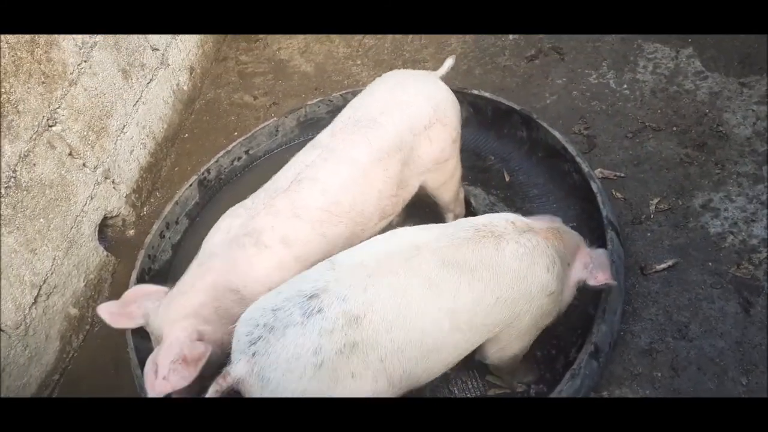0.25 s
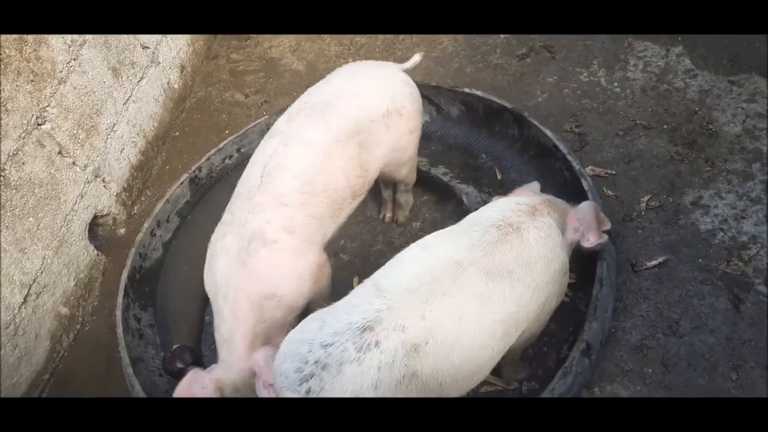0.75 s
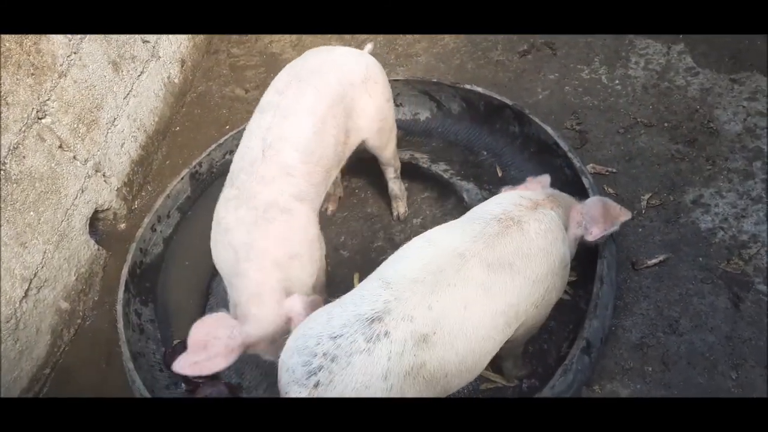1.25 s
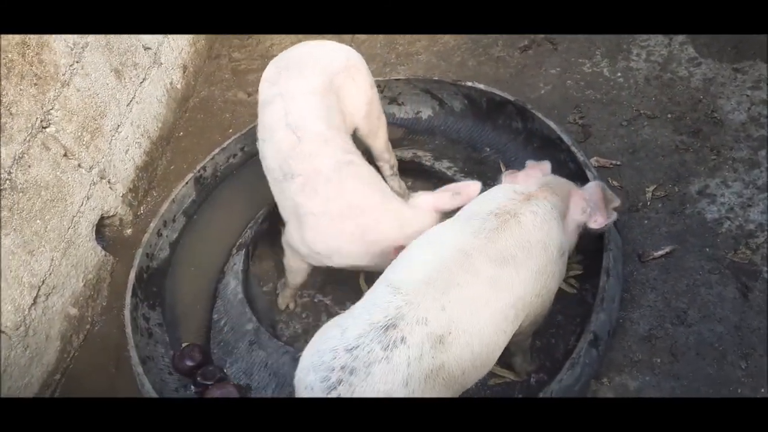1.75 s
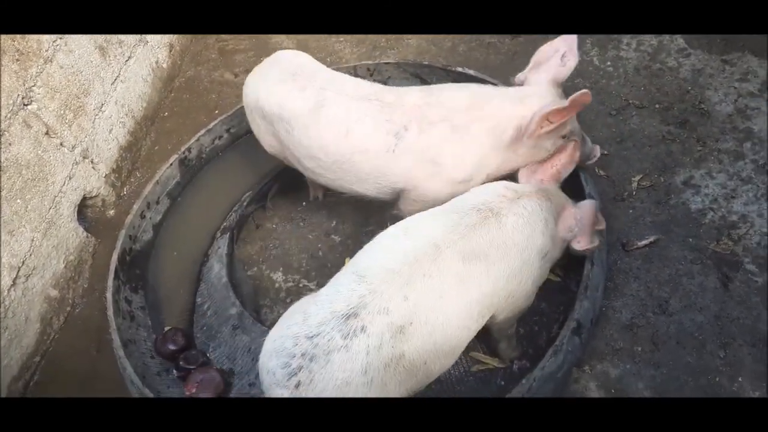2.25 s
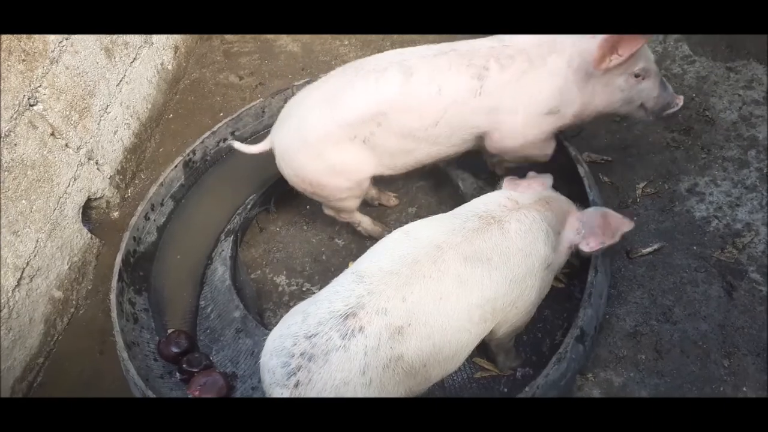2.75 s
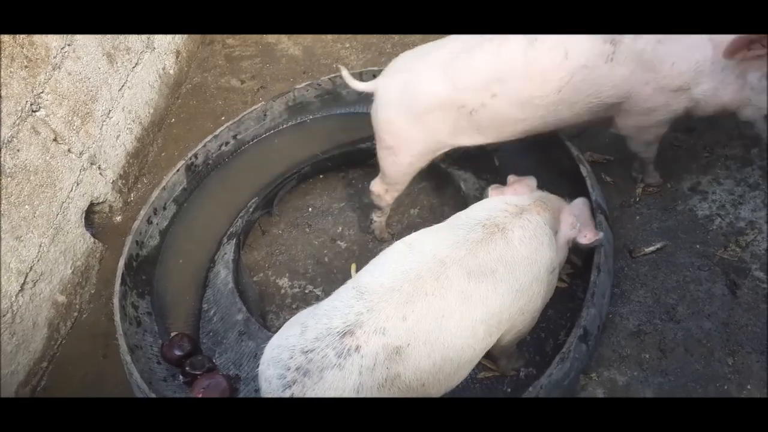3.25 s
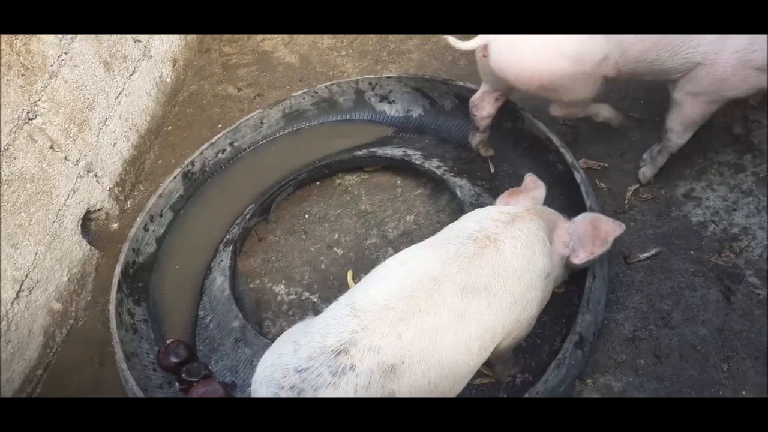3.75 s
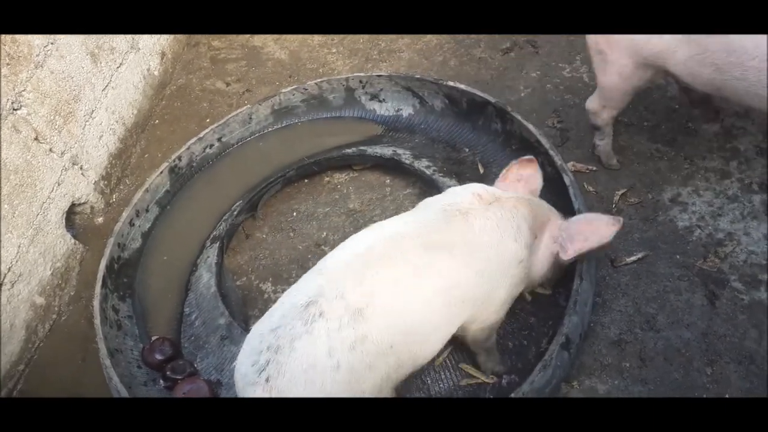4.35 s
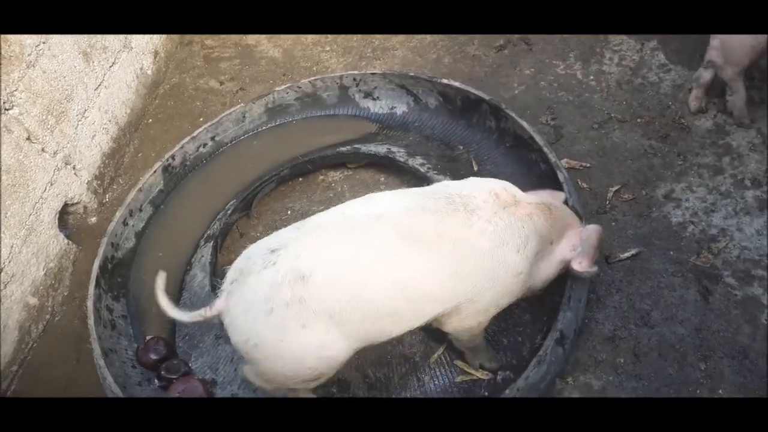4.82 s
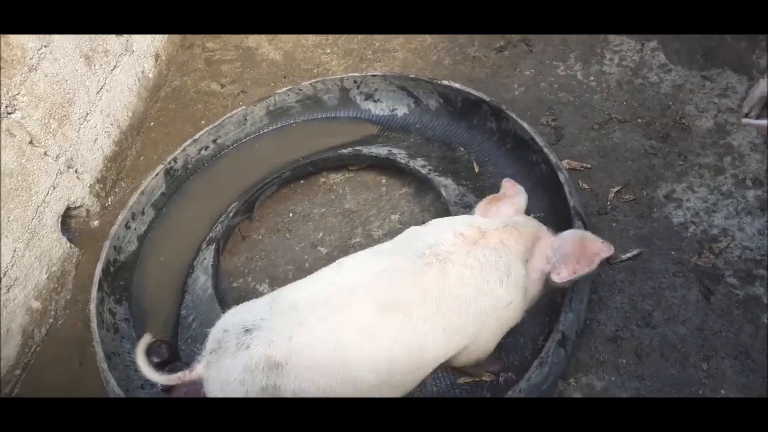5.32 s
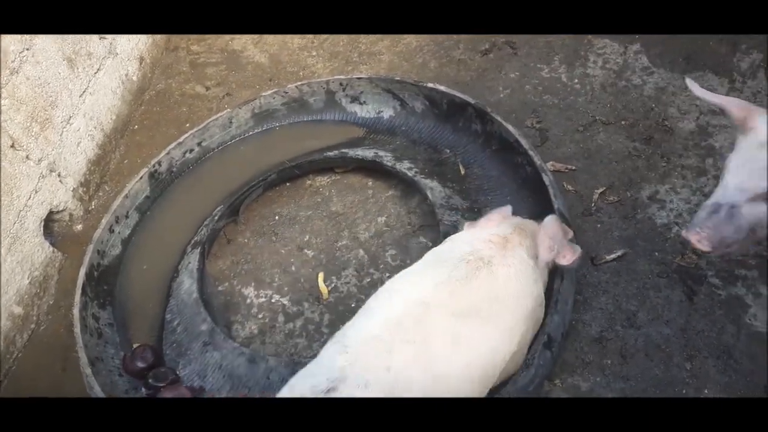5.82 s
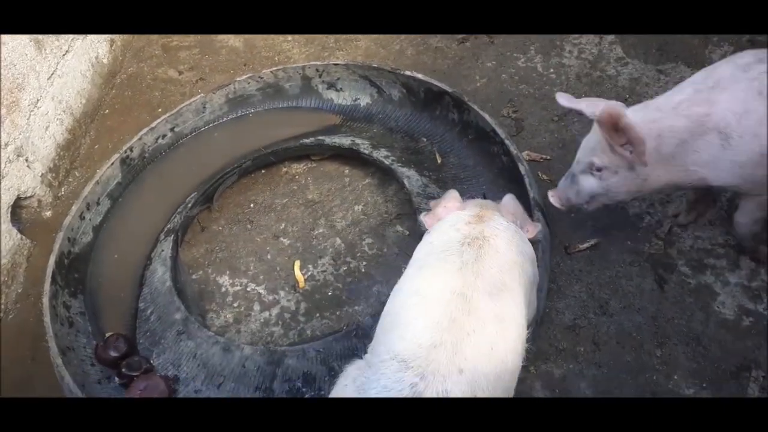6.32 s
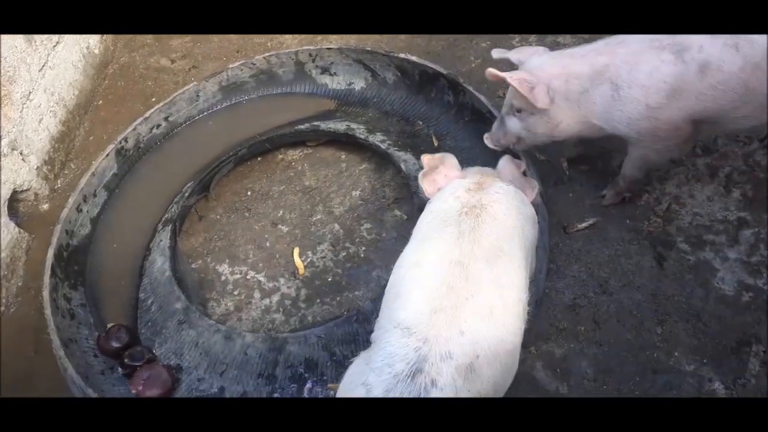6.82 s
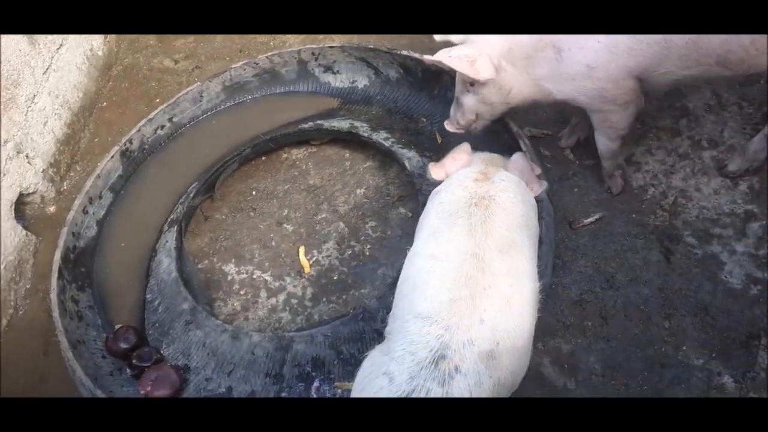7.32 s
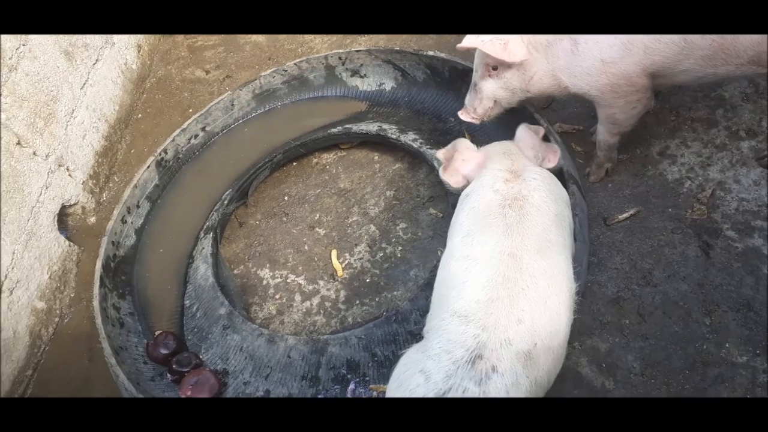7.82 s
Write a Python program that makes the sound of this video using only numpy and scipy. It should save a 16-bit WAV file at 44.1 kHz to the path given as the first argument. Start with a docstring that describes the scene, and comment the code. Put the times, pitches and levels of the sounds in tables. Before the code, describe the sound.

Two young pigs feed from a halved rubber tyre in a small concrete sty, heard close in stereo, slightly to the right. For the first two seconds there are soft wet smacks, chewing, tiny dry clicks and a few light knocks. At about 2.5 seconds a hoof stamps hard on the wet rim, the loudest sound, a sharp slap with a brief hollow boom. From 3 to 5.5 seconds hooves and snouts knock irregularly on the rubber while slop churns, with small splashes around 4.3, a low thud at 4.6 and a strong knock at 4.8. Between 5.7 and 6.7 seconds the pigs snuffle and smack busily among lighter knocks, and a faint, thin high hiss comes up and stays. The last second or so is quieter, with soft chewing and a throaty snuffle near 7.7 seconds.

```python
"""Two young pigs at a tyre trough

A stereo pair in a small concrete sty, the pigs a little to the right, feeding from a halved tyre.
They smack and chew, hooves and snouts knock the rubber, and one stamps hard as it climbs out.
Snouts churn the slop; the close walls boom briefly, and a thin high hiss comes up toward the end."""
import sys
import numpy as np
from scipy import signal
from scipy.fft import rfft, irfft, next_fast_len
from scipy.io import wavfile
from scipy.ndimage import uniform_filter1d, map_coordinates

SR = 44100
rng = np.random.default_rng(int(sys.argv[2]) if len(sys.argv) > 2 else 0)


def dump(signal):
    """Clip the signal to [-1, 1] and save it as 16-bit WAV at the path in sys.argv[1]."""
    limited = np.clip(np.atleast_2d(signal).T, -1, 1)
    pcm = np.round(limited * 32767).astype(np.int16)
    wavfile.write(sys.argv[1], SR, pcm)


N = 356063

# Spectra of chewing, wet slaps and struck rubber. Each row: frequency in Hz, level in dB.
CHEW_SPECTRUM = [(600, -27), (1000, -2.5), (1600, 2.5), (2300, -4), (3300, -6), (5000, -8.5), (9000, -48.5)]
WET_SPECTRUM = [(200, -44), (700, 18), (1500, 5), (2600, -16), (4500, 4.5), (8000, 0), (15000, -10)]
RUBBER_SPECTRUM = [(30, -45), (70, -27), (150, -8), (220, 2.5), (330, 4.5), (550, 0), (850, 1.5),
                   (1300, -7), (3000, -22), (9000, -64)]
# How alike the sty sounds at the two microphones. Each row: frequency in Hz, likeness from 0 to 1.
COHERENCE = [(100, 0.82), (300, 0.96), (700, 0.93), (2000, 0.19), (4500, 0.068), (12000, 0.033)]


def amp(db):
    return 10 ** (np.asarray(db) / 20)


def unit(x):
    return x / np.sqrt(np.mean(x ** 2) + 1e-20)


def crest(x):
    """Scale a burst so that its loudest 4 ms have rms 1."""
    return x / np.sqrt(uniform_filter1d(x * x, size=176).max() + 1e-20)


def fade(t, t60):
    """Exponential decay, 60 dB down after t60."""
    return np.exp(-np.log(1000) * t / max(t60, 1e-3))


def rise(t, seconds):
    return 1 - np.exp(-t / seconds)


def along(points, hz):
    """Read (Hz, value) points on a log axis."""
    freqs, values = np.transpose(points)
    return np.interp(np.log(hz + 1), np.log(freqs + 1), values)


def wobble(rate, n):
    """A smooth random curve of n samples, rate knots a second."""
    return map_coordinates(rng.standard_normal(int(n * rate / SR) + 4), [np.arange(n) * rate / SR])


def filtered(x, response):
    """x through a complex frequency response."""
    n = x.shape[-1]
    padded = next_fast_len(n + 4096)
    return irfft(rfft(x, padded) * response(np.fft.rfftfreq(padded, 1 / SR)), padded)[..., :n]


def coloured(x, spectrum):
    """x shaped by a spectrum, at rms 1."""
    return unit(filtered(x, lambda hz: amp(along(spectrum, hz))))


def cavity(x, hz, q):
    """x through one resonance, at rms 1."""
    return unit(filtered(x, lambda f: 1j * f * hz / q / (hz ** 2 - f * f + 1j * f * hz / q)))


def crackle(n, spread_db):
    """Noise broken into millisecond grains of uneven size."""
    return rng.standard_normal(n) * amp(spread_db * np.clip(wobble(900, n), -2, 2))


def add(track, start, sound):
    """Mix a sound into the track at start seconds."""
    part = track[:, max(round(start * SR), 0):][:, :sound.shape[-1]]
    part += sound[..., :part.shape[1]]


def at_mics(x, start=0):
    """The left microphone is shaded; the pig near the middle is heard first,
    then feeding further right reaches that microphone later."""
    # Each row: time in seconds, delay at the left microphone in seconds.
    left_delay = [(0, .00005), (1.7, .00005), (2.1, .00043), (8.07, .00043)]
    n = np.arange(len(x))
    lag = np.round(SR * np.interp(start + n / SR, *np.transpose(left_delay))).astype(int)
    return np.array([amp(-1.3) * x[np.maximum(n - lag, 0)], x])


def in_sty(x, start, wet_db):
    """Direct sound plus the answer of the close walls, different for every spot."""
    # Each row: frequency in Hz, reverberation time in seconds.
    wall_t60 = [(100, 1), (400, 0.24), (1000, 0.16), (2500, 0.15), (8000, 0.12), (16000, 0.15)]
    hz, t, noise = signal.stft(rng.standard_normal((3, SR // 2)), SR, nperseg=256)
    alike = along(COHERENCE, hz)[:, None]
    pair = np.sqrt(alike) * noise[0] + np.sqrt(1 - alike) * noise[1:]
    decay = np.exp(-np.log(1000) * t / along(wall_t60, hz)[:, None])
    tail = signal.istft(pair * decay, SR, nperseg=256)[1]
    tail *= 1 - np.exp(-(np.arange(tail.shape[1]) / SR / 0.0013) ** 2)
    out = amp(wet_db) * signal.fftconvolve(x[None], tail / np.linalg.norm(tail[0]), axes=1)
    out[:, :len(x)] += at_mics(x, start)
    return out


def diffuse(spectrum, grain_db, lump_db, lump_rate, from_trough=True):
    """A stereo bed of rms 1 made of grains that come in lumps."""
    shared = crackle(N, grain_db)
    shared = at_mics(shared) if from_trough else np.array([shared, shared])
    own = np.array([crackle(N, grain_db), crackle(N, grain_db)])
    pair = filtered(shared, lambda hz: np.sqrt(along(COHERENCE, hz)))
    pair += filtered(own, lambda hz: np.sqrt(1 - along(COHERENCE, hz)))
    return coloured(pair * amp(lump_db * wobble(lump_rate, N)), spectrum)


def knocks():
    """Hooves and snouts strike the tyre: a damped note of rubber, a dull rattle, a thud, a wet crack."""
    # Each row: start in seconds, level in dB, pitch in Hz, relative rattle in dB.
    blows = [(.583, -41, 486, -3.5), (.593, -42.5, 264, -3.5), (.703, -35, 490, -8), (.708, -48, 215, -3),
             (1.806, -37, 753, -5), (1.932, -36, 884, -6), (2.008, -39, 297, -5.5), (2.479, -19, 335, -31),
             (2.839, -40, 245, -1.5), (3, -37.5, 193, -2.5), (3.244, -29, 770, -5.5),
             (3.257, -33, 219, -6.5), (3.3581, -26.5, 800, 1.5), (3.363, -24, 314, -3.5),
             (3.48, -37.5, 201, 0), (3.751, -32.5, 342, -11), (3.83, -40, 336, -3.5), (4.079, -46, 298, -2),
             (4.191, -37, 470, -20), (4.251, -37.5, 202, -2), (4.257, -28, 333, -5.5),
             (4.298, -37.5, 317, 1), (4.4344, -27.5, 370, -8.5), (4.542, -33.5, 490, -17),
             (4.639, -35, 208, -24), (4.8075, -17, 787, -13), (5.053, -29, 765, -10.5),
             (5.098, -31, 356, -7), (5.269, -29.5, 480, -10), (5.333, -33, 364, -6.5),
             (5.698, -40, 358, 4.5), (5.738, -36, 610, 0.5), (5.772, -33, 387, -6.5), (6.072, -47, 420, 5),
             (6.211, -37, 342, -24), (6.263, -34.5, 360, -5.5), (6.341, -35, 350, -2.5),
             (6.505, -47, 295, 4), (6.613, -32.5, 357, -15)]
    out, t = np.zeros((2, N)), np.arange(SR // 2) / SR
    ring_cycles, contact_s = 17, 0.0014
    give = 1 - np.exp(-(t / contact_s) ** 2)
    for start, db, hz, rattle_db in blows:
        t60 = ring_cycles / hz * 2 ** (-(db + 30) / 29)  # harder blows press and damp the rubber sooner
        thud_db = -19.5 - 6 * np.log2(hz / 347)  # low blows shake the tyre wall most
        crack_db = -45 + 0.099 * db - db  # the wet film's slap grows only a little with force
        noise = rng.standard_normal((2, len(t)))
        note = crest(np.sin(2 * np.pi * hz * t) * fade(t, t60) * rise(t, 0.0012))
        rattle = crest(coloured(noise[0], RUBBER_SPECTRUM) * fade(t, 0.051) * give)
        thud = crest(np.sin(2 * np.pi * 112 * t) * fade(t, 0.14) * rise(t, 0.014))
        crack = crest(coloured(noise[1], WET_SPECTRUM) * fade(t, 0.042))
        blow = note + amp(rattle_db + 5) * rattle + amp(thud_db) * thud + amp(crack_db) * crack
        add(out, start, amp(db - 5) * in_sty(blow + amp(-23) * hollow(t), start, wet_db=-8.5))
    return out


def stamp():
    """A hoof slaps the wet rim: a sharp crack, a short bright ring and a long shudder."""
    # Each row: start in seconds, level in dB.
    hoof_falls = [(2.4703, -12.5)]
    # Each row: frequency in Hz, level in dB, time to fall 60 dB in seconds.
    rim_modes = [(684, 4.5, 0.019), (1450, 3, 0.018), (1660, 3.5, 0.022), (2114, 0, 0.025),
                 (2550, -31, 0.033)]
    out, t = np.zeros((2, N)), np.arange(SR // 2) / SR
    for start, db in hoof_falls:
        ring = sum(amp(level) * fade(t, t60) * np.sin(2 * np.pi * hz * t) for hz, level, t60 in rim_modes)
        crack = coloured(rng.standard_normal(len(t)), WET_SPECTRUM) * fade(t, 0.0055)
        shudder = coloured(rng.standard_normal(len(t)), RUBBER_SPECTRUM) * fade(t, 0.56)
        slap = amp(-7) * ring + amp(-34) * crack + amp(-17) * shudder + amp(-13.5) * hollow(t)
        add(out, start, amp(db) * in_sty(slap, start, wet_db=-9))
    return out


def hollow(t):
    """After a blow the low modes of trough and sty build up and die, wavering as neighbours beat."""
    # Each row: frequency in Hz, level in dB, time to fall 60 dB in seconds.
    low_modes = [(214, -8, .4), (265, -8, .3), (338, 0, .38), (430, -9, .28), (470, -5, .35), (501, 1, .42),
                 (632, -7, .32), (708, -10, .28), (850, -11, .26)]
    boom = np.zeros(len(t))
    for hz, db, t60 in low_modes:
        envelope = amp(db + 2.5 * wobble(30, len(t))) * fade(t, t60)
        phase = 2 * np.pi * (hz * t + rng.random()) + 0.9 * wobble(40, len(t))
        boom += envelope * np.sin(phase)
    return boom * rise(t, 0.03)


def bumps():
    """A body's weight sets the tyre wall booming; the note swells and dies."""
    # Each row: start in seconds, level in dB, pitch in Hz, swell and 60 dB decay in seconds.
    shoves = [(1.997, -36.5, 125, 0.01, 0.12), (2.345, -41, 115, .012, 0.13), (2.488, -19, 119.2, .05, 0.4),
              (2.69, -38, 112.4, 0.018, 0.49), (4.64, -21, 110.5, 0.033, 0.18),
              (7.181, -38, 83, 0.011, 0.064)]
    out, t = np.zeros((2, N)), np.arange(SR) / SR
    for start, db, hz, swell, t60 in shoves:
        phase = 2 * np.pi * hz * t + 0.13 * wobble(20, len(t))
        add(out, start, amp(db) * at_mics(np.sin(phase) * fade(t, t60) * rise(t, swell), start))
    return out


def smacks():
    """Wet films peel, then tear in tiny pops that ring mouth and lips and throw a fine spray."""
    # Each row: time in seconds, level in dB, mouth and lip pitch in Hz, brightness in dB, decay in seconds.
    tears = [(.048, -45.5, 1680, 6000, -1.5, .04), (0.131, -40.5, 2180, 2700, -2.5, 0.025),
             (0.302, -39.5, 1720, 3400, -1.5, 0.028), (0.404, -46, 2300, 2970, 1, 0.083),
             (0.445, -45, 1740, 2490, -5, 0.04), (0.583, -48.5, 1290, 4300, -0.5, 0.079),
             (0.7006, -47.5, 2280, 2720, 1.5, 0.054), (1.119, -49, 1400, 2370, -4.5, .06),
             (1.424, -44.5, 1520, 2240, -13, 0.098), (1.4974, -49, 1550, 4660, 0.5, .054),
             (1.85, -48, 1280, 5900, -8, .057), (1.888, -44.5, 1960, 3230, -4, .041),
             (1.987, -47.5, 1280, 8540, -8.5, 0.053), (2.468, -19, 1620, 2300, -7, 0.024),
             (2.688, -46, 1420, 7660, -6, 0.046), (2.799, -45, 1490, 2620, -8.5, 0.026),
             (3.152, -35.5, 1700, 3700, -4, 0.02), (3.408, -41.5, 1350, 2740, -3, 0.099),
             (3.873, -41.5, 1510, 2380, -8, 0.05), (3.902, -49, 1520, 5400, -3.5, 0.038),
             (4.251, -40, 1280, 2680, -6, .06), (4.2843, -35, 1720, 3220, -2.5, 0.043),
             (4.389, -36, 1940, 3020, -10, 0.028), (4.476, -41.5, 1450, 4800, -11, 0.026),
             (5.012, -45, 1960, 2800, -2.5, 0.071), (5.1906, -42.5, 1920, 4170, -8, 0.048),
             (5.361, -45.5, 1960, 2730, -2.5, 0.23), (5.465, -51, 1780, 5460, 6.5, 0.016),
             (5.5298, -42, 1810, 5350, -11.5, 0.047), (5.698, -37.5, 1450, 2770, -6.5, 0.03),
             (5.841, -41.5, 2260, 3470, -1.5, .038), (5.977, -41.5, 1700, 2720, -4.5, 0.29),
             (6.0377, -39, 1690, 5100, -1.5, 0.1), (6.1215, -41, 2440, 3040, -0.5, 0.064),
             (6.333, -38, 1900, 2680, -7, 0.15), (6.3988, -36.5, 2430, 3500, -0.5, 0.085),
             (6.6614, -38.5, 2390, 2520, -4, 0.044)]
    peel_s = 0.007
    out, t = np.zeros((2, N)), np.arange(SR // 4) / SR - peel_s
    for start, db, mouth_hz, lip_hz, bright_db, t60 in tears:
        shape = np.where(t < 0, amp(-12) * np.exp(-np.abs(t) / 0.005), fade(np.abs(t), t60))
        pops = crackle(len(t), spread_db=4) * amp(2 * wobble(200, len(t))) * shape
        mouth = cavity(cavity(pops, mouth_hz, q=3.5), mouth_hz, q=1.45)
        mouth = crest(mouth + amp(-6) * coloured(pops, WET_SPECTRUM))
        lips = crest(cavity(cavity(pops, lip_hz, q=4.1), lip_hz, q=0.26))
        mouth_share = np.sqrt(np.clip(1 - amp(bright_db) ** 2, 0.15, 1))  # the cavities share the energy
        spray_db = -6.5 + 1.27 * bright_db  # brighter smacks throw more spray
        smack = mouth_share * mouth + amp(bright_db) * lips + amp(spray_db) * spray(shape)
        add(out, start - peel_s, amp(db - 3) * in_sty(smack, start, wet_db=-1.5))
    return out


def spray(shape):
    """Fine drops fly off a tearing film, following its envelope."""
    # Each row: frequency in Hz, level in dB.
    spray_spectrum = [(2500, -19), (6000, 18), (8800, 20), (10000, -5), (12500, 5.5), (16000, -14.5)]
    return crest(coloured(crackle(len(shape), spread_db=-2.5), spray_spectrum) * shape)


def chews():
    """The jaw squeezes wet feed: a soft run of pops swells and dies inside the mouth."""
    # Each row: start in seconds, level in dB, mouth resonance in Hz, decay in seconds.
    squelches = [(0.489, -52, 1550, 0.035), (0.892, -45, 1460, 0.075), (0.974, -42, 1470, 0.27),
                 (1.266, -48, 1330, 0.08), (1.542, -42.5, 1260, .093), (2.129, -45, 1460, 0.07),
                 (2.2905, -48, 2000, 0.035), (3.524, -47, 1870, 0.073), (3.956, -45.5, 1690, 0.087),
                 (4.1694, -40.5, 1660, 0.045), (4.921, -46, 2340, 0.045), (6.803, -44.5, 1420, 0.04),
                 (6.926, -48, 1950, 0.049), (7.211, -46.5, 2060, .039), (7.433, -49.5, 2230, 0.074),
                 (7.922, -44, 2200, 0.029), (8.0125, -41, 3120, 0.052)]
    out, t = np.zeros((2, N)), np.arange(SR // 4) / SR
    for start, db, hz, t60 in squelches:
        envelope = fade(t, t60) * rise(t, 0.015) ** 2
        pops = crackle(len(t), spread_db=2) * amp(3.5 * wobble(156, len(t))) * envelope
        mouth = cavity(cavity(pops, hz, q=4.2), hz, q=0.22) + coloured(pops, CHEW_SPECTRUM) / 2
        add(out, start, amp(db - 7.5) * in_sty(crest(mouth), start, wet_db=-5))
    return out


def snuffles():
    """A snout shoves through the slop: a fluttering swell with a nasal ring and a throaty body."""
    # Each row: start in seconds, level in dB, snout resonance in Hz, throat in dB, decay in seconds.
    breaths = [(0.18, -51, 550, -9, 0.44), (0.772, -70, 268, -2, 0.11), (5.096, -47, 610, 10, 0.25),
               (5.748, -41.5, 600, -14, 0.22), (6.11, -41, 680, -23, 0.31), (6.207, -38, 720, -22, 0.25),
               (6.349, -40.5, 685, -3.5, 0.2), (6.596, -39, 516, 5, 0.28), (7.721, -42, 305, 12, 0.46)]
    # Each row: frequency in Hz, level in dB.
    throat_spectrum = [(40, -30), (80, -34), (120, 5.5), (160, -7), (260, -3.5), (330, 7.5), (420, -11),
                       (700, -6.5), (1500, -40), (4000, -64)]
    out, t = np.zeros((2, N)), np.arange(SR // 2) / SR
    for start, db, hz, throat_db, t60 in breaths:
        envelope = fade(t, t60) * rise(t, 0.014) ** 2
        flow = crackle(len(t), spread_db=3) * amp(3.2 * wobble(69.2, len(t))) * envelope
        nose = cavity(cavity(flow, hz, q=1.43), hz, q=0.17)
        throat = amp(throat_db) * coloured(flow, throat_spectrum)
        add(out, start, amp(db) * in_sty(crest(nose + throat), start, wet_db=-10.5))
    return out


def rooting():
    """Snouts churn the slop into lumps and gurgles, jaws grind, and the wet feed pops and fizzes."""
    # Each row: frequency in Hz, level in dB.
    slosh_spectrum = [(25, -29), (55, -2), (90, -11), (120, -7), (155, -7), (215, -5), (335, 1.5),
                      (430, -3), (600, -14), (800, -7.5), (1100, -29), (1600, -45), (3000, -73)]
    fizz_spectrum = [(1800, -29), (3500, 0), (6000, 6), (9000, 6.5), (9900, -16), (12000, 3.5),
                     (16000, -10.5)]
    effort_db = effort()
    slosh_db = -62.5 + effort_db
    chew_db = -60.5 + 0.69 * effort_db
    fizz_db = -64.5 + 0.29 * effort_db
    slosh = amp(slosh_db - 2) * diffuse(slosh_spectrum, grain_db=-0.5, lump_db=2.5, lump_rate=51)
    chew = amp(chew_db - 8) * diffuse(CHEW_SPECTRUM, grain_db=3, lump_db=0.5, lump_rate=55)
    fizz = amp(fizz_db - 3) * diffuse(fizz_spectrum, grain_db=0.5, lump_db=1.5, lump_rate=39)
    crackles = bubbles(fizz_db - 8, count=260, centre_hz=5500, spread=0.38, cycles=5.7)
    gurgles = bubbles(slosh_db - 12, count=400, centre_hz=692, spread=0.31, cycles=10.8)
    pops = bubbles(chew_db - 13, count=600, centre_hz=1870, spread=0.486, cycles=34)
    return slosh + chew + fizz + gurgles + pops + crackles


def effort():
    """How hard the slop is worked, in dB over idle feeding: each bout rises, holds and settles."""
    # Each row: start in seconds, length in seconds, strength in dB.
    bouts = [(1.92, 0.22, 5), (2.412, 0.19, 18.5), (2.827, 0.35, 8), (3.33, 0.07, 24.5), (3.614, 0.59, 6),
             (4.234, 0.16, 16), (4.545, 0.32, 9.5), (5.035, 0.34, 18), (5.45, 0.14, 9), (5.897, 0.31, 13),
             (6.514, 0.11, 11.5), (7.685, 0.43, 6.5)]
    rise_s, settle_s = 0.024, 0.61
    stir, t = np.zeros(N), np.arange(N) / SR
    for start, length, db in bouts:
        onset = np.clip((t - start) / rise_s, 0, 1)
        stir += amp(db) * onset * fade(np.maximum(t - start - length, 0), settle_s)
    return 10 * np.log10(1 + stir ** 2)


def bubbles(level_db, count, centre_hz, spread, cycles):
    """Bubbles burst at random, each a short rising note, as loud as the stirring allows."""
    when, softness = rng.random((count, 2)).T[:, :, None]
    hz = np.clip(centre_hz * np.exp(spread * rng.standard_normal((count, 1))), 120, 12000)
    t = np.arange(SR // 25) / SR
    age = t * hz / cycles
    glide = 1 + 0.051 * np.minimum(age, 2)
    notes = np.sin(2 * np.pi * hz * t * glide) * fade(age, 1) * rise(t, 0.5 / hz)
    samples = (when * N).astype(int) + np.arange(len(t))
    train = np.bincount(samples.ravel(), (notes * amp(-20 * softness)).ravel(), N)[:N]
    return in_sty(unit(train) * amp(level_db), start=0, wet_db=2)[:, :N]


def splashes():
    """Droplets thrown by feet and snouts sizzle briefly at the very top."""
    # Each row: start in seconds, level in dB, decay in seconds.
    throws = [(0.293, -46.5, 0.065), (0.402, -51, 0.047), (0.563, -53, .12), (0.695, -42.5, .034),
              (1.845, -55, 0.054), (1.983, -59, .06), (4.246, -46, 0.066), (4.285, -50, 0.092),
              (4.397, -44, 0.19), (4.477, -45.5, 0.17), (4.549, -52.5, 0.21), (4.839, -51, 0.032)]
    # Each row: frequency in Hz, level in dB.
    mist_spectrum = [(4000, -0.5), (8000, 5), (10000, 1.5), (13000, -4), (16000, 1)]
    out, t = np.zeros((2, N)), np.arange(SR // 4) / SR
    for start, db, t60 in throws:
        drops = coloured(crackle(len(t), spread_db=7.5), mist_spectrum) * fade(t, t60) * rise(t, 0.0018)
        add(out, start, amp(db) * in_sty(crest(drops), start, wet_db=2))
    return out


def ticks():
    """Grit and husks snap in single dry clicks; just before the stamp a smack and its faint lead-in click the
    same way."""
    # Each row: start in seconds, level in dB, pitch in Hz.
    snaps = [(.3244, -38, 1820), (.366, -38.5, 2200), (.852, -36, 7940), (2.2725, -38.5, 4760),
             (2.441, -29.5, 1510), (2.4657, -34, 1600), (2.5407, -28, 2250), (4.8417, -34, 15600),
             (5.95, -38, 2990), (6.403, -37, 11000)]
    out, t = np.zeros((2, N)), np.arange(SR // 20) / SR
    for start, db, hz in snaps:
        snap = rng.standard_normal(len(t)) * fade(t, 0.007)
        click = crest(cavity(snap, hz, q=1.8) + amp(-21) * unit(snap))
        add(out, start, amp(db - 5.5) * in_sty(click, start, wet_db=-7.5))
    return out


def background():
    """Quiet air of the sty, and a thin high hiss that comes up late and flickers."""
    # Each row: frequency in Hz, level in dB.
    air_spectrum = [(25, -6), (60, -38), (130, -12), (330, -23), (600, -28), (1200, -7.5), (3000, -6),
                    (9000, -6), (10000, -8.5), (16000, -11.5)]
    hiss_spectrum = [(3000, -15), (10000, -16), (12000, -16), (13200, -7), (14300, -11.5), (15800, -14)]
    # Each row: time in seconds, level in dB.
    hiss_levels = [(0, -90), (4.0, -82), (5.78, -57), (6.1, -54.5), (6.7, -56.5), (8.07, -55.5)]
    hiss_db = np.interp(np.arange(N) / SR, *np.transpose(hiss_levels))
    air = diffuse(air_spectrum, grain_db=3.8, lump_db=-3.9, lump_rate=20, from_trough=False)
    flicker_db = 1.6 * wobble(11, N) + 1.5 * wobble(45, N)
    hiss = diffuse(hiss_spectrum, grain_db=-5.5, lump_db=1.5, lump_rate=120, from_trough=False)
    return amp(-64) * air + amp(hiss_db + flicker_db - 1) * hiss


def scene():
    """The pigs are toward the right; the hiss is nearer the middle."""
    # Tone of the pigs at the left microphone. Each row: frequency in Hz, gain in dB.
    left_tone = [(100, -2.4), (1000, -1.8), (2000, -2.5), (4500, -3.5), (9000, -4), (16000, 8)]
    trough = knocks() + stamp() + bumps()
    left, right = trough + smacks() + splashes() + chews() + snuffles() + ticks() + rooting()
    pigs = np.array([filtered(left, lambda hz: amp(along(left_tone, hz))), amp(3.5) * right])
    return pigs + background() * amp([[0], [1.5]])


def record(dry):
    """The recorder cuts the deep bass and keeps nothing above its band limit."""
    low_cut_hz, top_hz = 48, 15900
    thinned = signal.sosfilt(signal.butter(4, low_cut_hz, "highpass", fs=SR, output="sos"), dry)
    return filtered(thinned, lambda hz: hz < top_hz)


dry = scene()
out = record(dry)
dump(out)
```